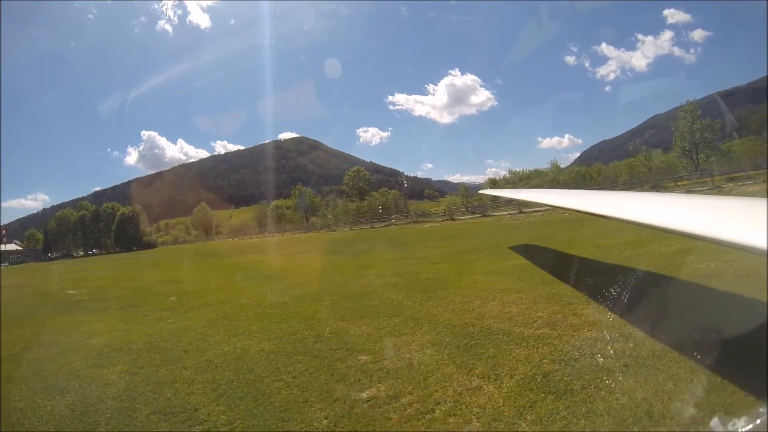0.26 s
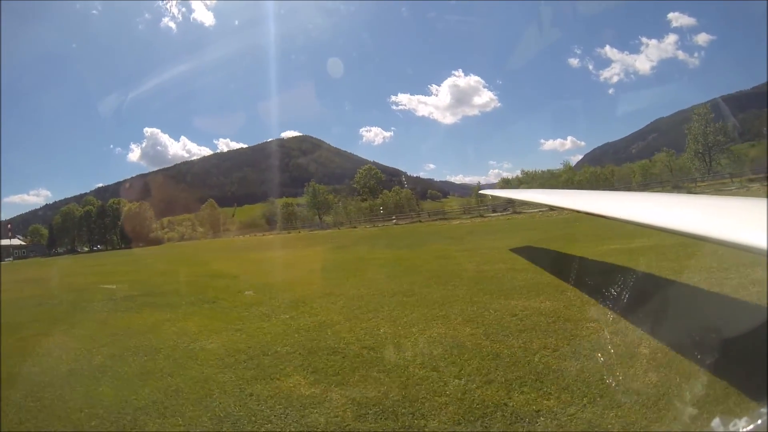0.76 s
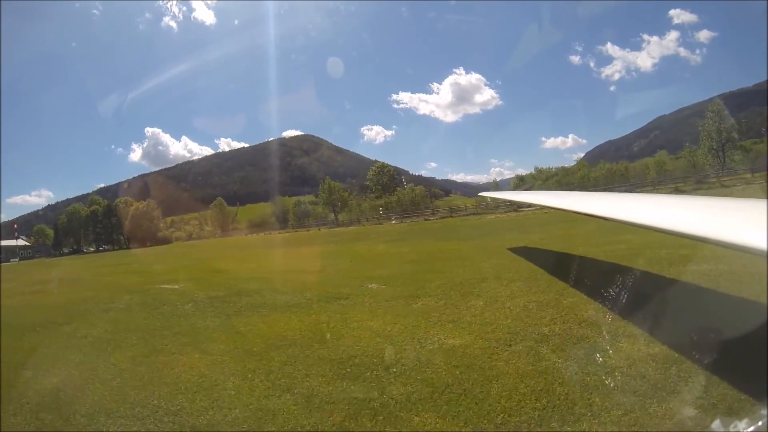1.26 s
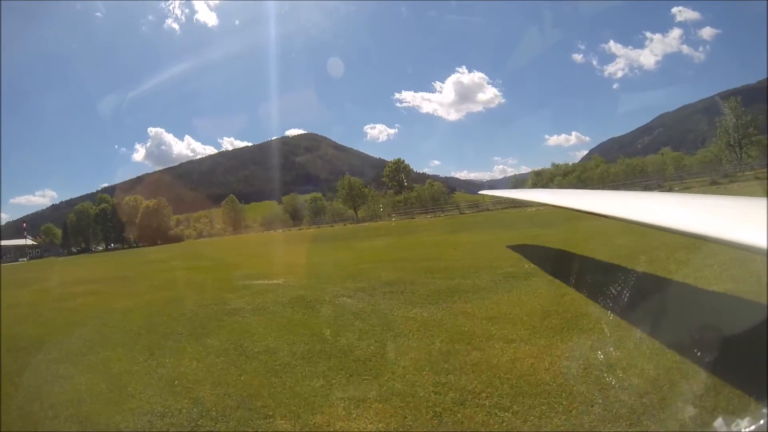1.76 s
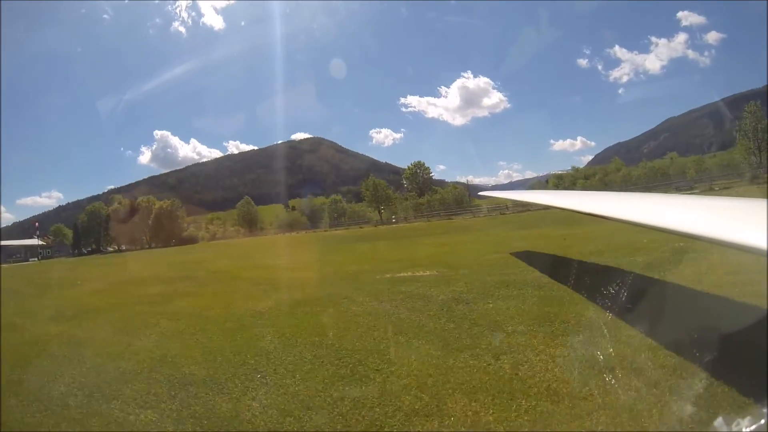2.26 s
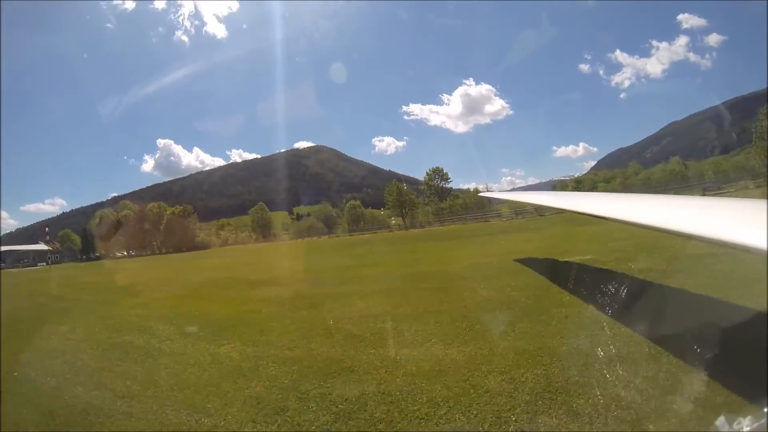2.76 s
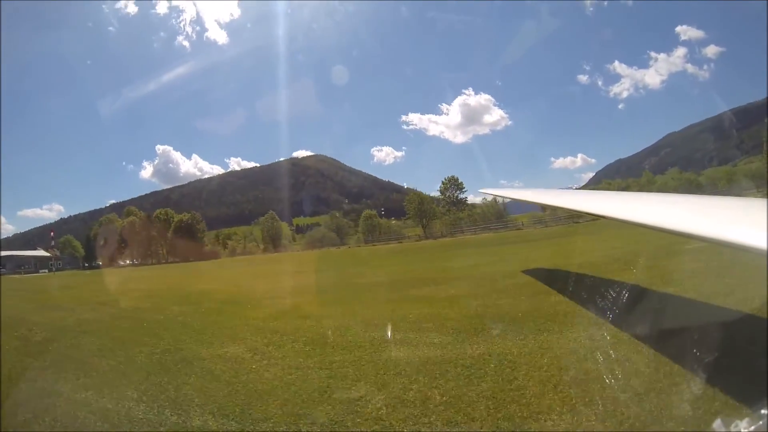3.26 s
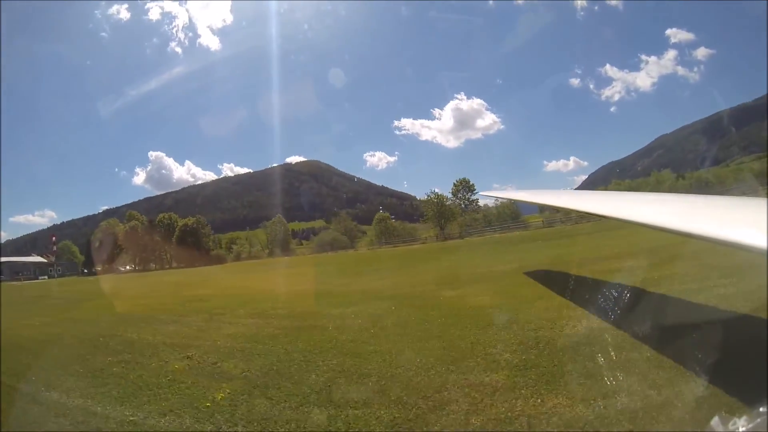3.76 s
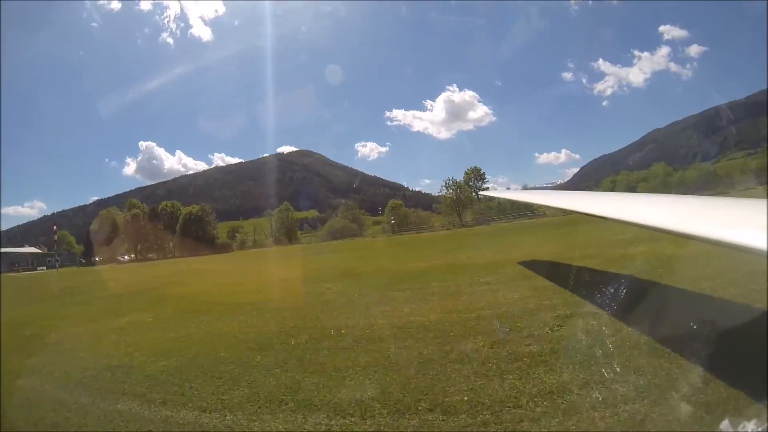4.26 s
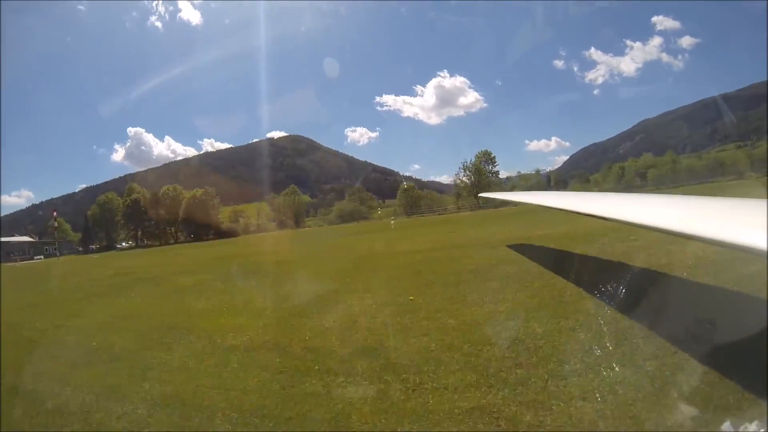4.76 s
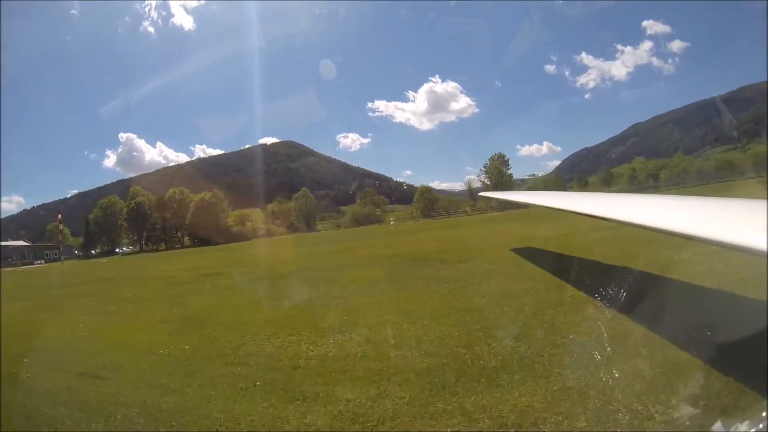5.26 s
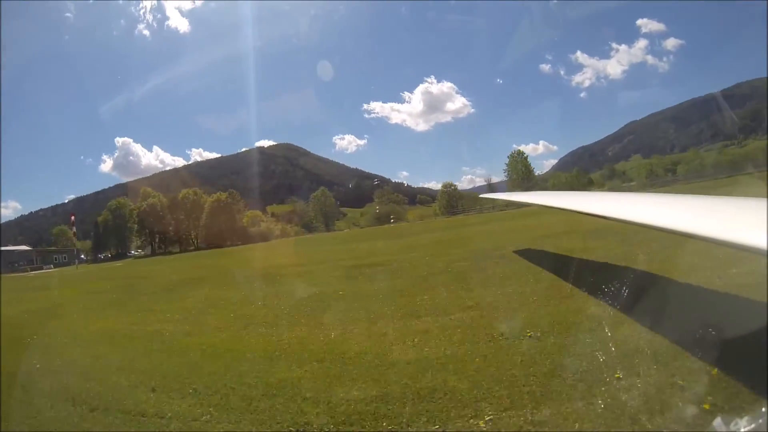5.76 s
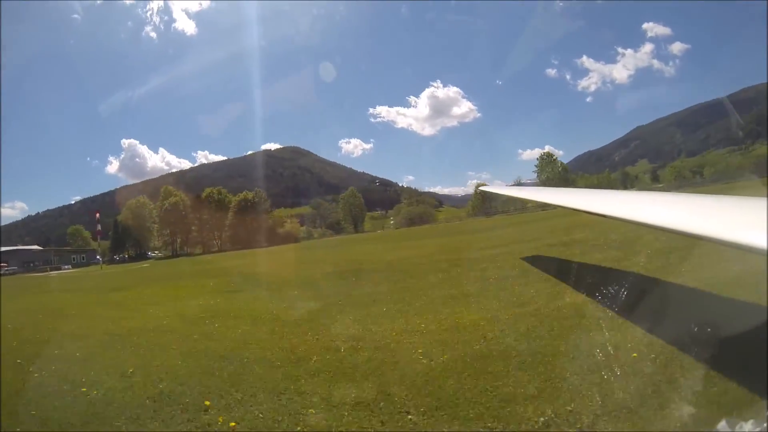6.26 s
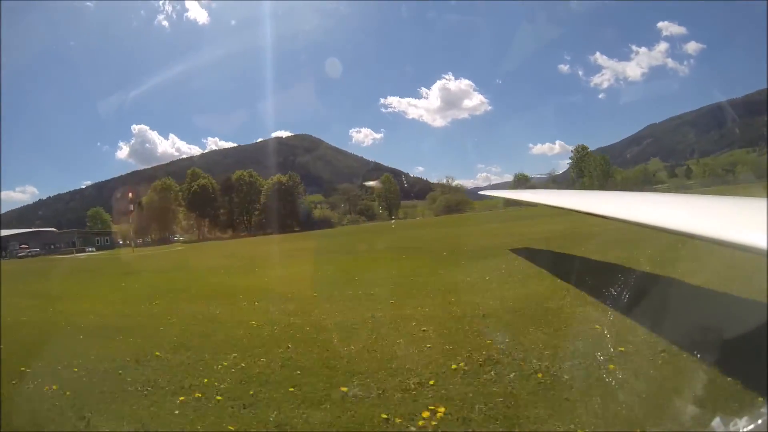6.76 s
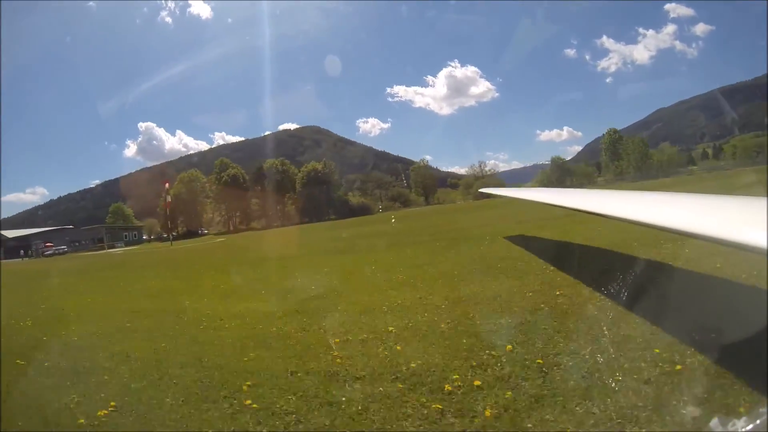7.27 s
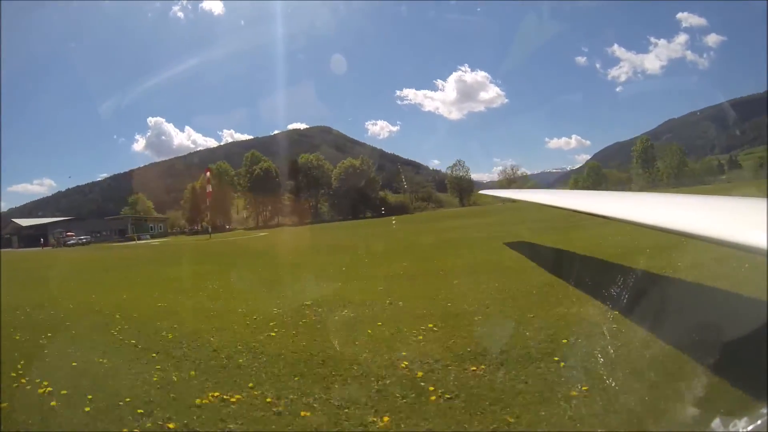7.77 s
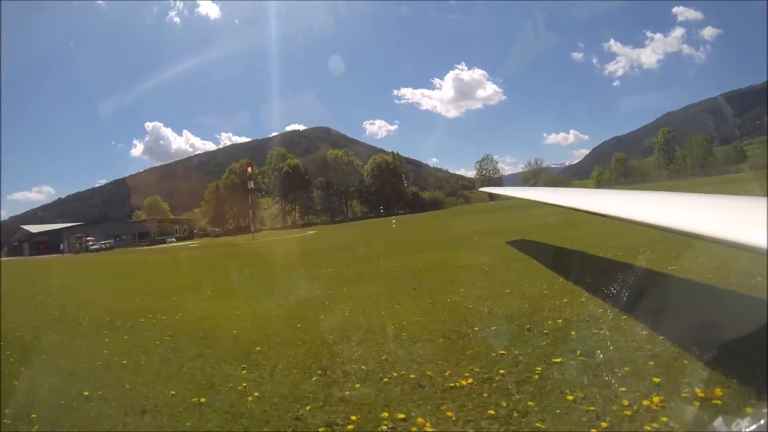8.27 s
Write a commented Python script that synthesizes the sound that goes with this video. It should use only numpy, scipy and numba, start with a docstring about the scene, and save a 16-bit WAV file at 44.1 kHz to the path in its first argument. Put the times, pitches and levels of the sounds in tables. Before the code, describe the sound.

A small camera microphone inside a glider cockpit picks up a rough takeoff roll on a grass strip. Low, bouncing rumble swallows the distant tow plane's whine early on. Bumps thud and knock through the wheel box, fittings clack, and a short groan comes before the wheel goes light. Rattle eases and returns, with scattered dry ticks and faint limiter crackle.

```python
"""A propeller whines and rasps ahead, then a shaking, booming cockpit takes over: a glider starts its aerotow.
The place is a grass strip; a small camera's microphone sits under the closed canopy, the tow plane out ahead.
Harmonics of the blade beat and pulsed noise make the propeller; noise through resonances makes shake and boom.
Random impacts, coloured by spectra, make the shell's rattle and the grass; timed bursts make jolts, knocks,
clacks and dry ticks. The camera's stepped limiter adds faint ticks on the tall bass crests."""
import sys
import numpy as np
from scipy import signal
from scipy.fft import rfft, irfft
from scipy.io import wavfile
from scipy.ndimage import uniform_filter1d
from numba import njit

SR = 44100
rng = np.random.default_rng(int(sys.argv[2]) if len(sys.argv) > 2 else 0)


def file_out(sig):
    """Save sig as 16-bit WAV at sys.argv[1]."""
    # one column per channel
    cols = np.atleast_2d(sig).T
    # limit, then scale
    lim = np.clip(cols, -1, 1)
    pcm = np.round(lim * 32767).astype(np.int16)
    wavfile.write(sys.argv[1], SR, pcm)


N = 374850
T = np.arange(N) / SR  # time of every sample [s]

# All levels are relative: they set each layer before its make-up gain and the camera.
# Tow plane ahead, strength of its rasp: (time [s], level [dB])
TOW_LEVEL = [(0.0, -48), (0.27, -47.5), (0.39, -37.5), (0.52, -41.5), (0.72, -49.5), (0.85, -40.5),
             (1.08, -43), (1.21, -49.5), (1.5, -49)]
# Propeller whine as the canopy passes it: (frequency [Hz], level [dB])
WHINE_SPECTRUM = [(1390, -15.5), (1490, -0.5), (1650, -11), (1815, 3), (1980, -1), (2140, -7.5),
                  (2700, -17)]
# Turbulent rasp of the blades: (frequency [Hz], density [dB per Hz])
RASP_SPECTRUM = [(250, -17.5), (800, 3.5), (1100, 0.5), (1550, -3), (1880, 3.5), (2150, -4.5), (2650, -15),
                 (3400, -6.5), (6500, -36), (12000, -60.5)]
# Grass swish on even turf: (time [s], level [dB])
GRASS_LEVEL = [(0, -50.5), (1.3, -52.5), (1.8, -54.5), (3.6, -52.5), (4.6, -58.5), (8.4, -57)]
# Grass on wheel and belly: (frequency [Hz], density [dB per Hz])
SWISH_SPECTRUM = [(600, -18.5), (1400, -5), (2050, 4.5), (2750, -4), (3400, -3), (4500, -11), (6000, -16),
                  (7800, -25), (9400, -21.5), (12000, -37), (15500, -36)]
# Thin jingle of metal parts: (frequency [Hz], density [dB per Hz])
JINGLE_SPECTRUM = [(4000, -31), (7000, -16), (8200, -7), (9300, 1), (10500, -3), (11600, -10.5),
                   (15000, -16.5)]
# Loudest dry ticks: (time [s], level [dB])
TICK_EVENTS = [(0.073, -38), (0.658, -40), (1.04, -41), (2.481, -40), (2.574, -44), (2.604, -37),
               (2.9074, -42), (3.138, -44.5), (3.4806, -44), (3.698, -40), (3.765, -39.5), (3.9667, -38),
               (4.15, -38), (4.2234, -45), (4.323, -43), (4.403, -43), (4.43, -37.5), (4.7833, -39.5),
               (4.8176, -44), (4.8689, -50.5), (4.996, -40), (5.0938, -40.5), (5.214, -39.5),
               (5.8278, -40.5), (5.9562, -38.5), (6.025, -46), (6.27, -42.5), (6.6952, -38), (6.7351, -38),
               (6.8217, -38.5), (7.0976, -37), (7.1472, -45), (7.214, -40), (7.2407, -45), (7.2656, -37),
               (7.617, -40), (7.772, -43), (7.9165, -38), (8.0958, -41), (8.164, -43.5), (8.2701, -45.5),
               (8.4418, -40)]
# Wheel box resonances: (frequency [Hz], width [Hz], level [dB])
GROAN_MODES = [(283, 200, -1), (441, 53, 1.5), (900, 540, -22)]
# Loose cockpit fittings clack: (time [s], body level [dB], treble against the body [dB])
CLACK_EVENTS = [(1.42, -50, 6), (1.537, -33, -13), (1.5908, -28, -27), (2.0455, -28.5, -30),
                (2.073, -37, -10), (2.13, -28.5, -24), (2.265, -31, -9), (2.72, -22, -22),
                (3.325, -32.5, -11), (4.072, -39, -18), (5.549, -30, -25), (5.926, -36.5, -26),
                (6.307, -28.5, -23), (6.518, -37.5, -32), (8.193, -38, -29)]
# Body of a clack: (frequency [Hz], density [dB per Hz])
CLACK_SPECTRUM = [(400, -25.5), (1000, -16), (1500, 4.5), (2200, 7), (2750, -3), (3400, 2), (4500, -9),
                  (7000, -20.5), (14000, -45)]
# The wheel hits bumps: (time [s], level [dB])
KNOCK_EVENTS = [(0.33, -19.5), (0.753, -20), (1.01, -21.5), (1.141, -21.5), (1.275, -25.5), (1.592, -20.5),
                (2.073, -17), (2.109, -23), (2.131, -18), (2.709, -21), (3.304, -22.5), (3.631, -34),
                (4.069, -30.5), (4.526, -27), (4.764, -28), (4.98, -28.5), (5.305, -28), (5.43, -27),
                (5.761, -21.5), (5.929, -21), (6.076, -31), (6.311, -19.5), (6.362, -23), (6.466, -20),
                (6.616, -20), (6.995, -33.5), (7.738, -26), (8.199, -27)]
# Knock through the wheel box: (frequency [Hz], density [dB per Hz])
KNOCK_SPECTRUM = [(120, -21.5), (230, 9), (320, 0), (520, -2.5), (680, -7.5), (860, -11.5), (1150, -11.5),
                  (1500, -25.5), (4000, -61)]
# Shell rattle on even turf along the strip: (time [s], level [dB])
RATTLE_LEVEL = [(0, -48.5), (0.6, -39), (1.4, -45), (1.8, -39.5), (3.4, -40.5), (4.6, -46.5), (5.0, -42),
                (6.5, -38.5), (7.1, -43), (8.1, -41)]
# Drumming on the shell: (frequency [Hz], density [dB per Hz])
SHELL_SPECTRUM = [(120, -24), (220, 2), (330, 3.5), (450, -2), (620, -7), (830, -9.5), (1100, -10),
                  (1350, -20.5), (2000, -22), (2800, -34), (6000, -72)]
# Narrow rings of the shell panels: (frequency [Hz], width [Hz], gain at the centre [linear])
PANEL_RINGS = [(324, 4.2, 0.41), (437, 11, 0.37), (491, 13, 0.53), (816.5, 24, 0.93)]
# The wheel ploughs through rough patches: (start [s], length [s], extra rattle [dB], extra swish [dB])
ROUGH_PATCHES = [(1.257, 0.036, 10.5, 4.5), (1.473, 0.23, 4, -2), (1.967, 0.19, 8, 8.5),
                 (2.257, 0.079, 6, 3), (2.348, 0.21, 2, 3), (2.687, 0.19, 8.5, 3), (5.267, 0.062, 7, 6.5),
                 (5.393, 0.15, 5, 7.5), (5.634, 0.14, 4, 6.5), (6.104, 0.22, 0, 6.5),
                 (6.613, 0.12, 5.5, 6.5), (6.953, 0.14, -0.5, 3), (8.397, 0.075, 5.5, 6.5)]
# The glider skips and the wheel goes light: (start [s], length [s], drop of the ground noise [dB])
WHEEL_SKIPS = [(2.458, 0.2, 9.5), (2.847, 0.418, 8.5), (4.294, 0.32, 5.5), (4.793, 0.11, 7),
               (5.777, 0.2, 4.5), (6.754, 0.16, 2.5), (7.25, 0.17, 3)]
# Heavy jolts: (time [s], thud [dB], boom of the cockpit air [dB])
JOLT_EVENTS = [(0.069, -4.5, -16), (0.233, -19.5, -7), (0.51, -7.5, -21), (0.541, -7, -16.5),
               (0.628, -5, -6.5), (0.995, -12, -17.5), (1.153, -11.5, -18), (1.526, -9, -19),
               (2.069, -5.5, -15.5), (3.336, -12.5, -20), (4.155, -17, -11.5), (5.68, -21.5, -15),
               (6.675, -10.5, -4), (7.238, -16, -15), (8.239, -18, -7.5)]
# Thud of a jolt: (frequency [Hz], density [dB per Hz])
JOLT_SPECTRUM = [(70, -28), (125, -3), (150, 7), (185, -7.5), (225, -3), (290, -14.5), (420, -18),
                 (1500, -76.5)]
# Air booming in the cockpit: (time [s], level [dB])
BOOM_LEVEL = [(0, -19), (0.7, -24.5), (0.95, -18.5), (1.45, -28.5), (3.85, -27), (4.5, -31), (5.6, -25),
              (7.6, -25), (8.4, -24)]
# Cockpit air resonances: (frequency [Hz], width [Hz], level [dB])
AIR_MODES = [(134, 24.7, 0), (160.2, 36, -13), (242, 37, -23.5)]
# The fuselage bounces on its tyre: (frequency [Hz], width [Hz], level [dB])
BOUNCE_MODES = [(38.25, 5.5, 0)]
# The fuselage flexes: (frequency [Hz], width [Hz], level [dB])
FLEX_MODES = [(52.8, 6.8, -1), (62.4, 18, -1), (82.3, 33, -9.5)]

# Tow plane: mean blade beat; the whine swells this many dB per dB of rasp
BLADE_HZ, WHINE_DB, WHINE_FOLLOWS = 82.55, -15.5, .7
# Ground: small lumps surge the noise; patches and skips ease in and out
TURF_UNEVEN_DB, TURF_LUMPS_PER_S = 1.1, 7
PATCH_ATTACK_S, PATCH_RELEASE_S = .01, .083
UNLOAD_S, TOUCHDOWN_S = .13, .037
# Mean rate of the limiter's chances to step, and of the clicks within a dry tick
STEPS_PER_S = 1500
# Ticks: corners of a gentle and a second treble fall; make-up gain; the weaker tick that follows
TICK_HZ, TICK_TOP_HZ, TICK_DB = 700, 5000, 7
REBOUND_S, REBOUND_DB = .013, -9.5
# The wheel box groans under load just before the first skip
GROAN_S, GROAN_LENGTH_S, GROAN_DB = 2.34, .132, -29.5
# Jolts: the tyre rounds off the thud; the cockpit boom starts lower later in the run
TYRE_SOFT_HZ = 273
BOOM_HZ, BOOM_SAG_HZ_PER_S, BOOM_T60_S, BOOM_RISE_S = 145.5, 1.5, .26, .024
# Shake builds as the glider gathers speed, then holds but for one short lull
SHAKE_DB, SHAKE_START_DB, SHAKE_BUILD_S = -16.5, -3.5, .79
LULL_S, LULL_WIDTH_S, LULL_DB = 8, .05, -8
BOOM_FOLLOWS = .42  # dB of steady boom per dB of change in the ground's rattle
TOP_HZ = 15800  # upper edge of the camera's sound


def undb(db):
    """Decibels to gain."""
    return 10 ** (np.asarray(db) / 20)


def unit(x):
    """Scale to rms 1."""
    return x / np.sqrt(np.mean(x ** 2))


def curve(rows):
    """Rows of (time [s], level [dB]) as a gain for every sample."""
    return undb(np.interp(T, *np.transpose(rows)))


def stretch(start, length, attack_s, release_s):
    """Rises from 0 to 1, holds until its length is over, then falls back."""
    rise = np.clip((T - start) / attack_s, 0, 1)
    fall = np.clip(1 - (T - start - length) / release_s, 0, 1)
    return rise * fall


def walk(rate):
    """Random levels, rate of them a second, joined by straight lines; spread near 1."""
    steps = rng.standard_normal(4096)
    return np.sqrt(3 / 2) * np.interp(T * rate, np.arange(len(steps)), steps)


def colour(x, points):
    """Causal minimum-phase filter with the given spectrum and unit energy."""
    hz, db = np.transpose(points)
    size = 4096
    bins_hz = np.arange(size // 2 + 1) * SR / size + 1  # 1 Hz up keeps the logarithm finite
    log_gain = np.log(undb(np.interp(np.log(bins_hz), np.log(hz), db)))
    # folding the cepstrum onto positive times makes the filter causal
    cepstrum = irfft(log_gain)[:size // 2]
    cepstrum[0] = 0
    response = irfft(np.exp(rfft(2 * cepstrum, size)))
    return signal.fftconvolve(x, response / np.linalg.norm(response))[:len(x)]


def resonate(modes, evenness):
    """Noise drives broad resonances; dividing by a power of the swing's envelope evens out its size."""
    hz = np.arange(N // 2 + 1) * SR / N + 1
    gain = sum(undb(db) / (1 + ((hz ** 2 - f ** 2) / (hz * width)) ** 2) for f, width, db in modes)
    swing = irfft(rfft(rng.standard_normal(N)) * gain, N)
    window = int(SR / modes[0][1])
    power = uniform_filter1d(np.abs(signal.hilbert(swing)) ** 2, window)
    return unit(swing / power ** (evenness / 2))


def grains(rate, spread_db):
    """Random tiny impacts, a few much larger than the rest."""
    hit = rng.random(N) < rate / SR
    size = undb(spread_db * np.minimum(rng.exponential(size=N), 4))
    return unit(hit * size * rng.standard_normal(N))


def blows(times, levels_db, t60, chatter, rise):
    """Each blow is a short push; shaken parts start to chatter over about rise seconds and die away."""
    out = np.zeros(N + SR)
    t = np.arange(SR // 5) / SR
    decay = np.exp(-np.log(1000) * t / t60)
    onset = 1 - np.exp(-t / rise)
    for s, db in zip(times, levels_db):
        burst = rng.standard_normal(len(t)) * decay * onset * chatter
        burst[0] += 1  # the push itself
        start = int(s * SR)
        out[start:start + len(t)] += undb(db) * burst / np.linalg.norm(burst)
    return out[:N]


def panels(x):
    """Shell panels ring on at their own pitches."""
    rings = [gain * signal.lfilter(*signal.iirpeak(hz, hz / width, SR), x) for hz, width, gain in PANEL_RINGS]
    return x + sum(rings)


def ground():
    """Rough patches change rattle and swish, skips lower both; returns the changes in dB."""
    lumps_db = TURF_UNEVEN_DB * walk(TURF_LUMPS_PER_S)
    light_db = sum(drop_db * stretch(start, length, UNLOAD_S, TOUCHDOWN_S)
                   for start, length, drop_db in WHEEL_SKIPS)
    rattle_db = swish_db = lumps_db - light_db
    for start, length, extra_rattle_db, extra_swish_db in ROUGH_PATCHES:
        inside = stretch(start, length, PATCH_ATTACK_S, PATCH_RELEASE_S)
        rattle_db = rattle_db + extra_rattle_db * inside
        swish_db = swish_db + extra_swish_db * inside
    return rattle_db, swish_db


def tow_plane():
    """The blade beat sings as a comb of high harmonics; each beat adds a puff of turbulence."""
    turns = np.cumsum(BLADE_HZ * (1 + .0007 * walk(9))) / SR  # counted in blade beats
    beat = sum(np.cos(2 * np.pi * k * turns) for k in range(13, 33))
    puffs = rng.standard_normal(N) * (np.exp(-(turns % 1) / .57) + 1.1)
    level = curve(TOW_LEVEL)
    whine = unit(colour(beat, WHINE_SPECTRUM)) * level ** WHINE_FOLLOWS * undb(WHINE_DB)
    rasp = unit(colour(puffs, RASP_SPECTRUM)) * level * undb(-.5)
    # both fade under the ground noise, the whine first: slopes in dB per second
    rasp_fade = undb(-20 * np.maximum(T - TOW_LEVEL[-1][0], 0))
    whine_fade = undb(-45 * np.maximum(T - 1.12, 0))
    return rasp * rasp_fade + whine * whine_fade


def grass(jolt, ground_db):
    """Blades brush the wheel and belly as dense impacts; the strongest brushing brings out a metal jingle."""
    strength = curve(GRASS_LEVEL) * undb(ground_db)
    blades = grains(rate=5000, spread_db=3.2)
    contacts = grains(rate=4000, spread_db=1.5)
    brush = unit(colour(blades, SWISH_SPECTRUM) * jolt)
    jingle = colour(contacts, JINGLE_SPECTRUM) * strength / strength.max()
    return (brush + jingle * undb(-17)) * strength * undb(-3.5)


def ticks():
    """Dry ticks, each a few milliseconds of unevenly spaced clicks, with a shorter one after it."""
    s, db = np.transpose(TICK_EVENTS)
    clicks = np.zeros(N)
    for lag, drop_db, count in ((0, 0, 5), (REBOUND_S, REBOUND_DB, 2)):
        gaps = rng.uniform(.4, 1.6, (len(s), count)) / STEPS_PER_S
        for delay in np.cumsum(gaps, axis=1).T:
            clicks[((s + lag + delay) * SR).astype(int)] += undb(db + drop_db)
    soft = signal.sosfilt(signal.butter(1, TICK_TOP_HZ, fs=SR, output="sos"), clicks)
    return signal.lfilter([1], [1, -np.exp(-2 * np.pi * TICK_HZ / SR)], soft) * undb(TICK_DB)


def groan():
    """The loaded wheel box resonates in a short, juddering groan that ends as the wheel goes light."""
    judder = undb(3 * walk(45))
    span = stretch(GROAN_S, GROAN_LENGTH_S, attack_s=.024, release_s=.017)
    return resonate(GROAN_MODES, evenness=.83) * judder * span * undb(GROAN_DB)


def clacks():
    """Fittings strike the shell; their metal parts add a thin jingle."""
    s, db, treble_db = np.transpose(CLACK_EVENTS)
    strikes = blows(s, db, t60=.045, chatter=1, rise=.0025)
    shivers = blows(s, db + treble_db, t60=.042, chatter=.81, rise=.003)
    body = colour(strikes, CLACK_SPECTRUM) * undb(17)
    metal = colour(shivers, JINGLE_SPECTRUM) * undb(14)
    return body + metal


def knocks():
    """Bumps thud through the wheel box and set the panels ringing."""
    s, db = np.transpose(KNOCK_EVENTS)
    pushes = blows(s, db, t60=.075, chatter=.15, rise=.0015)
    return panels(colour(pushes, KNOCK_SPECTRUM)) * undb(22.5)


def rattle(jolt, ground_db):
    """Tufts and clods drum on the shell, in flurries that start sharply at each small bump."""
    bumps = np.abs(grains(rate=28, spread_db=1))
    flurries = unit(signal.lfilter([1], [1, -np.exp(-1 / (.014 * SR))], bumps))  # 14 ms decay
    density = jolt * (1 + .6 * np.minimum(flurries, 2))
    drumming = panels(colour(grains(rate=1800, spread_db=1.5), SHELL_SPECTRUM) * density)
    return unit(drumming) * curve(RATTLE_LEVEL) * undb(ground_db)


def jolts():
    """Heavy jolts thud through the soft tyre and leave the cockpit air ringing as a decaying sine."""
    s, thud_db, boom_db = np.transpose(JOLT_EVENTS)
    pushes = blows(s, thud_db, t60=.13, chatter=.079, rise=.0051)
    thud = colour(pushes, JOLT_SPECTRUM) * undb(24)
    t = np.arange(SR // 2) / SR
    swell = (1 - np.exp(-t / BOOM_RISE_S)) * np.exp(-np.log(1000) * t / BOOM_T60_S)
    swell = swell / swell.max()
    boom = np.zeros(N + SR)
    for when, db in zip(s, boom_db):
        start = int(when * SR)
        hz = BOOM_HZ - BOOM_SAG_HZ_PER_S * when
        boom[start:start + len(t)] += undb(db) * swell * np.sin(2 * np.pi * hz * t)
    tyre = signal.butter(2, TYRE_SOFT_HZ, fs=SR, output="sos")
    return signal.sosfilt(tyre, thud) + boom[:N] * undb(-5)


def cockpit_boom(ground_db):
    """The enclosed air resonates in a wavering boom that partly follows the ground."""
    air = resonate(AIR_MODES, evenness=.4) * undb(2.5 * walk(11))
    return air * curve(BOOM_LEVEL) * undb(BOOM_FOLLOWS * ground_db)


def shake():
    """Strength of the fuselage's shaking: it builds up, holds, and eases once."""
    build_db = SHAKE_START_DB * np.maximum(1 - T / SHAKE_BUILD_S, 0)
    lull = np.exp(-((T - LULL_S) / LULL_WIDTH_S) ** 2)
    return undb(SHAKE_DB + build_db + LULL_DB * lull)


def fuselage():
    """Rough ground makes the fuselage bounce on its tyre and flex, as low resonances driven by noise."""
    bounce = resonate(BOUNCE_MODES, evenness=.88)
    flex = resonate(FLEX_MODES, evenness=.15) * undb(3 * walk(7))
    return unit(bounce + undb(-5.5) * flex) * shake()


@njit
def step_gain(size, top, may_step, step, recovery):
    """The gain drops by steps while the sound is too tall; it always creeps back up towards 1."""
    out, gain = np.empty(len(size)), 1.
    for i in range(len(size)):
        if may_step[i] and size[i] * gain > top:
            gain *= step
        gain = min(gain * recovery, 1.)
        out[i] = gain
    return out


def limiter(x, top_db, step_db, recovery_db_per_s):
    """The gain drops in a quick, uneven run of steps on tall crests, heard as faint ticks."""
    may_step = rng.random(N) < STEPS_PER_S / SR
    gain = step_gain(np.abs(x), undb(top_db), may_step, undb(-step_db), undb(recovery_db_per_s / SR))
    return x * gain


def scene():
    """Everything reaches one microphone under the canopy."""
    jolt = undb(1.5 * walk(28) + 1.5 * walk(110))  # fast unevenness shared by grass and rattle
    rattle_db, swish_db = ground()
    background = tow_plane() + grass(jolt, swish_db)
    details = ticks() + groan() + clacks() + knocks()
    rolling = rattle(jolt, rattle_db) + jolts() + cockpit_boom(rattle_db) + fuselage()
    return (background + details + rolling)[None]


def record(dry):
    """The camera limits the bass crests, softens the highest treble and cuts the top."""
    held = limiter(dry[0] * undb(.8), top_db=-9, step_db=.25, recovery_db_per_s=13)
    soft = signal.sosfilt(signal.butter(2, 10500, fs=SR, output="sos"), held)
    return signal.sosfilt(signal.ellip(8, .2, 70, TOP_HZ, fs=SR, output="sos"), soft)[None]


dry = scene()
out = record(dry)
file_out(out)
```